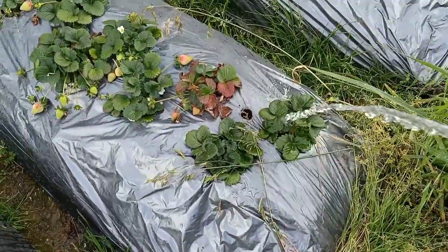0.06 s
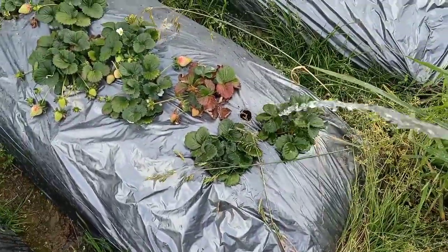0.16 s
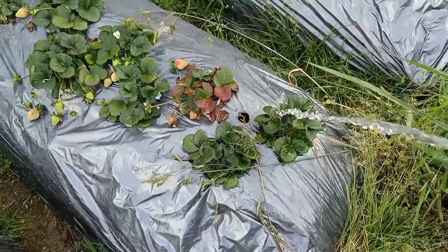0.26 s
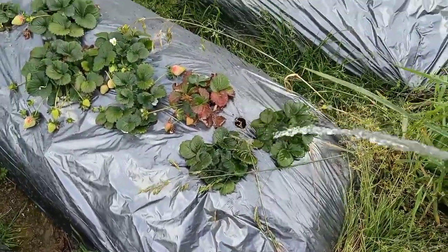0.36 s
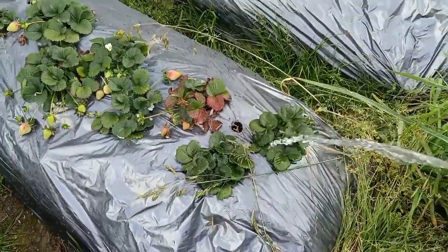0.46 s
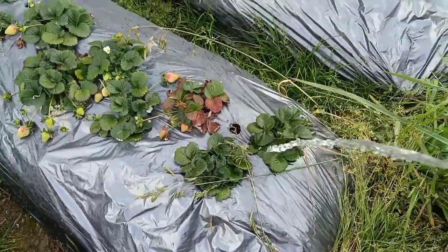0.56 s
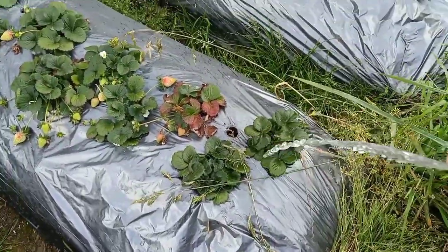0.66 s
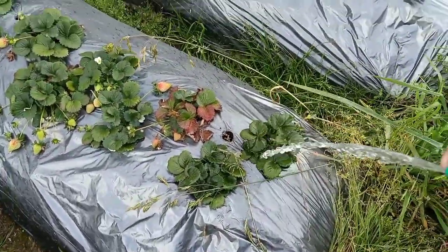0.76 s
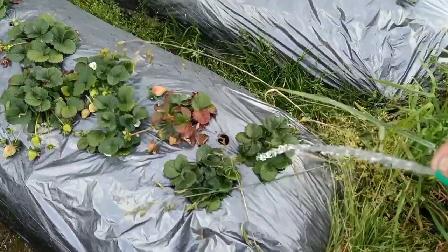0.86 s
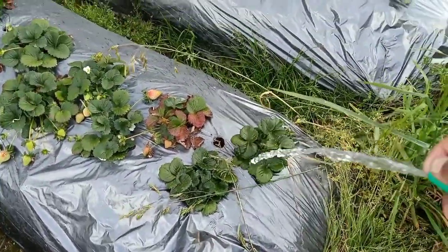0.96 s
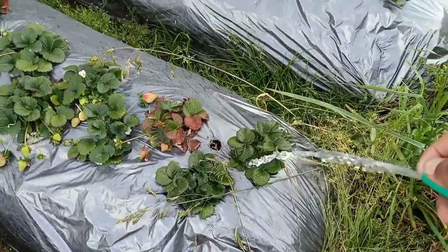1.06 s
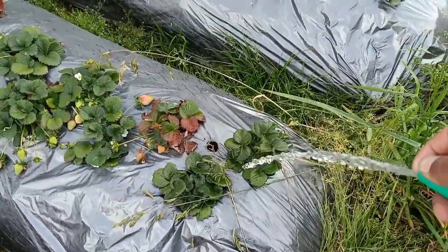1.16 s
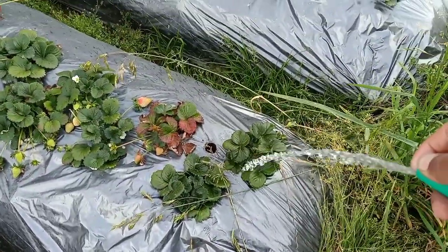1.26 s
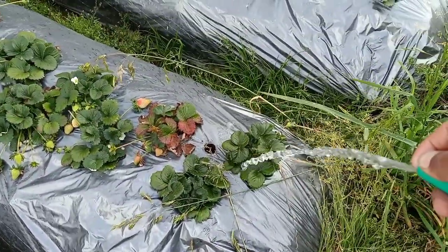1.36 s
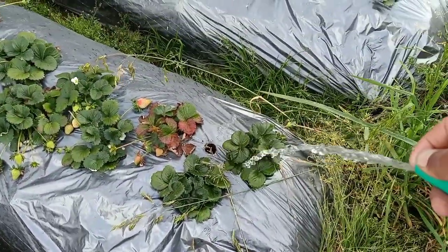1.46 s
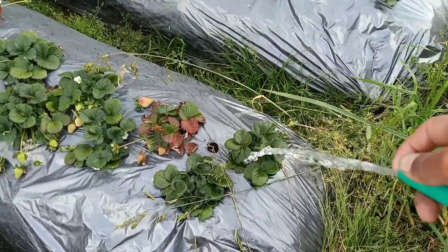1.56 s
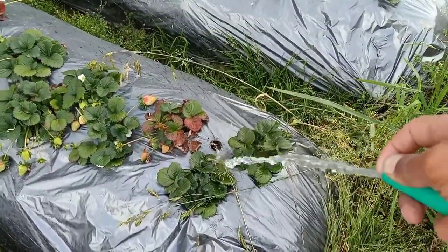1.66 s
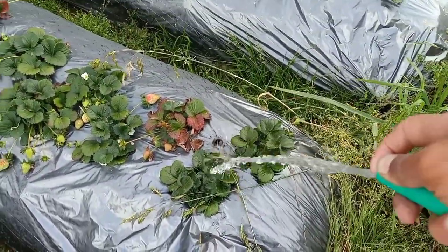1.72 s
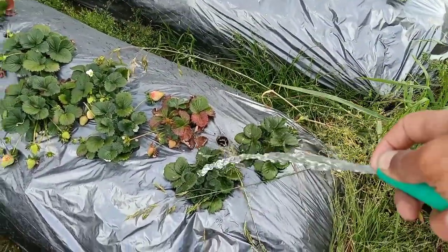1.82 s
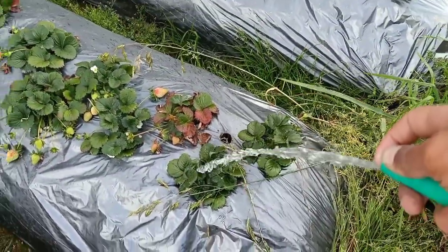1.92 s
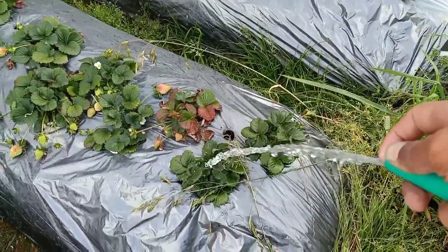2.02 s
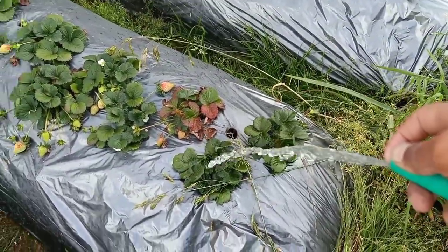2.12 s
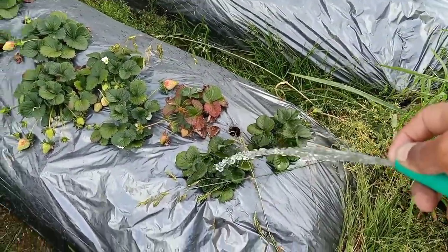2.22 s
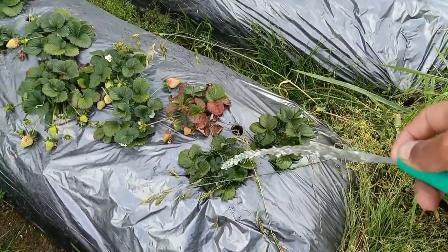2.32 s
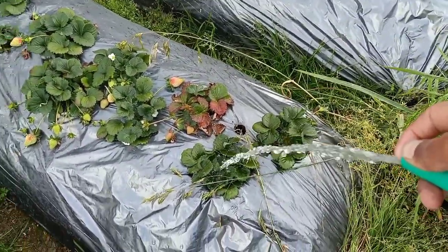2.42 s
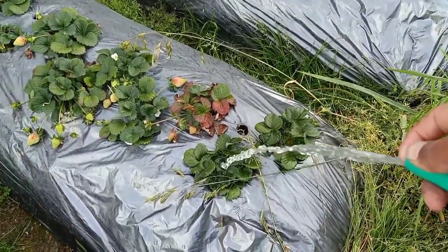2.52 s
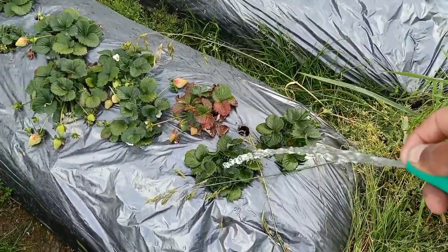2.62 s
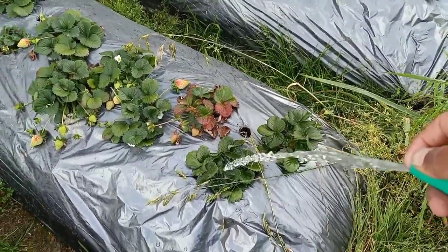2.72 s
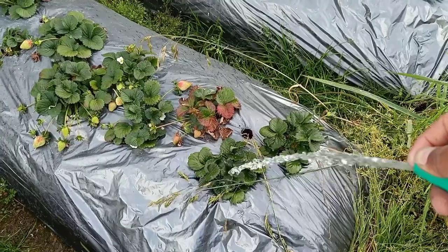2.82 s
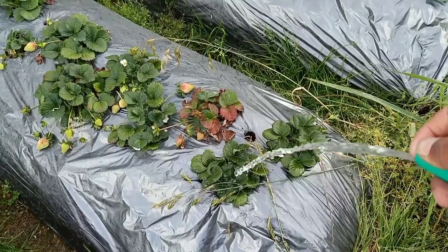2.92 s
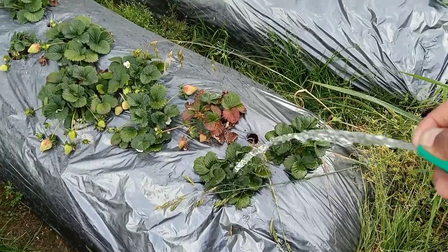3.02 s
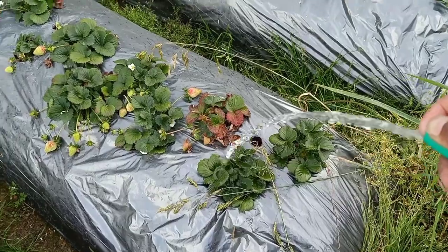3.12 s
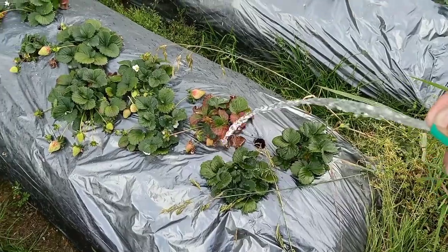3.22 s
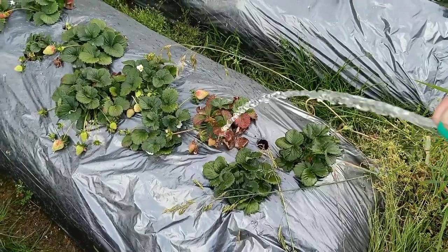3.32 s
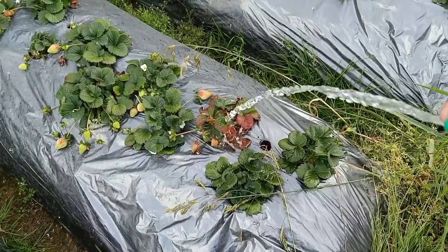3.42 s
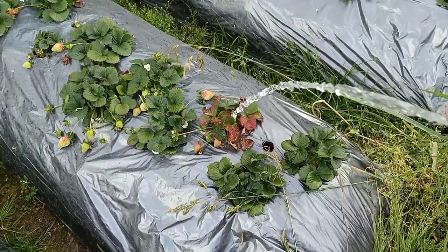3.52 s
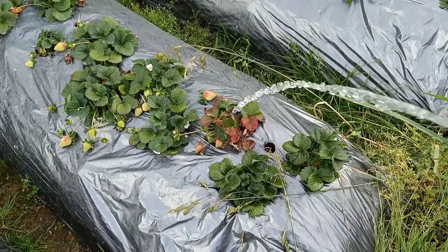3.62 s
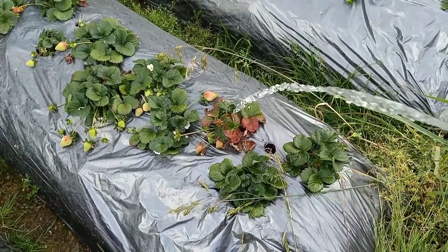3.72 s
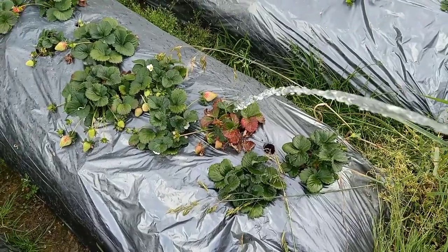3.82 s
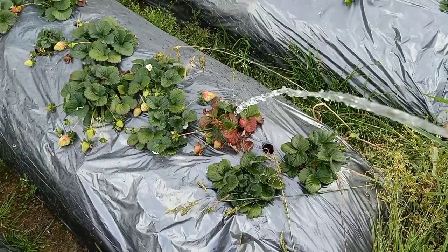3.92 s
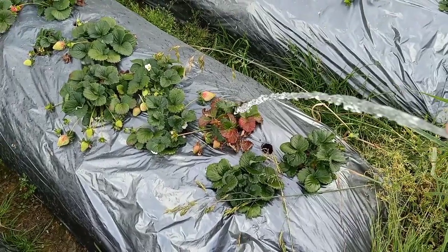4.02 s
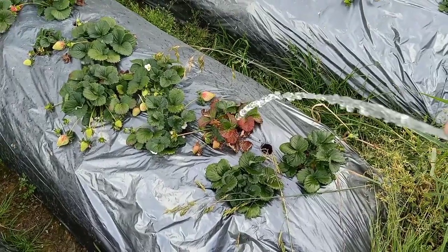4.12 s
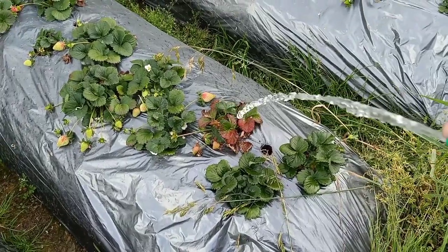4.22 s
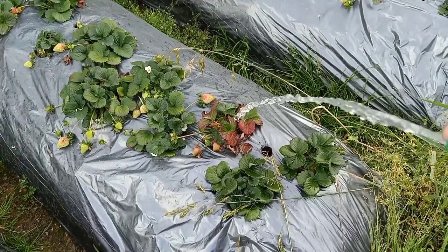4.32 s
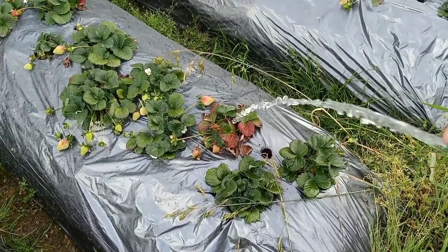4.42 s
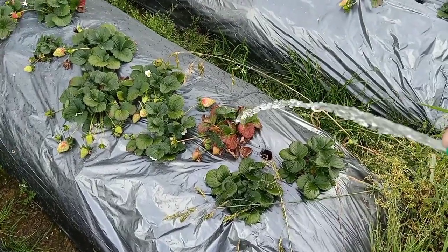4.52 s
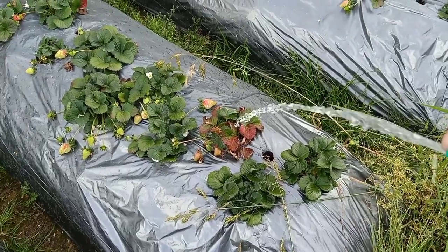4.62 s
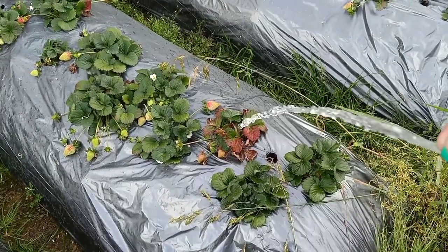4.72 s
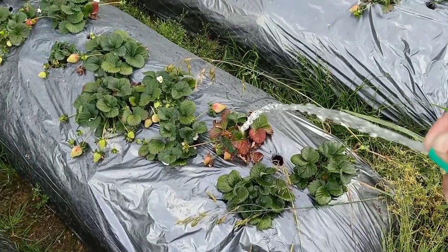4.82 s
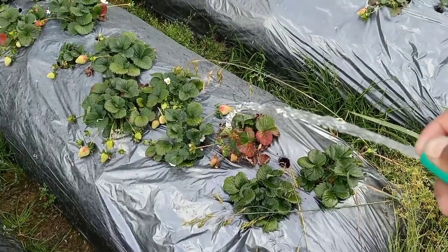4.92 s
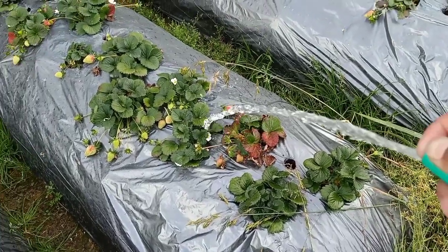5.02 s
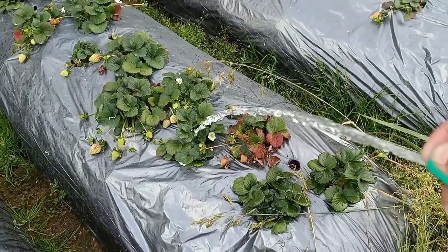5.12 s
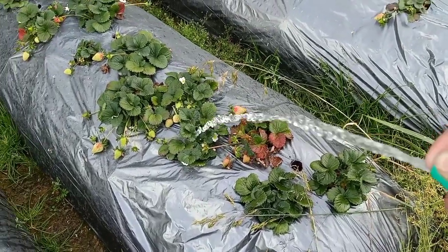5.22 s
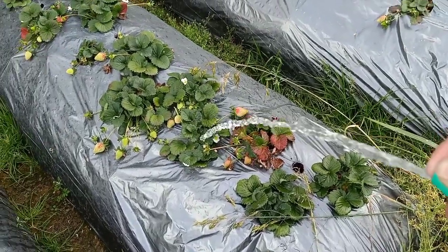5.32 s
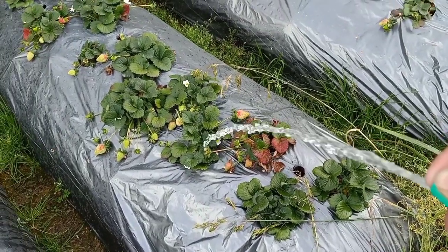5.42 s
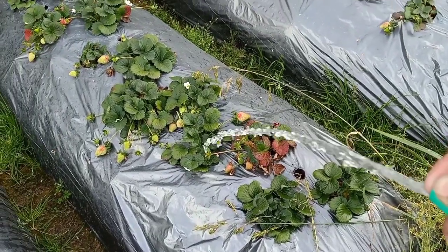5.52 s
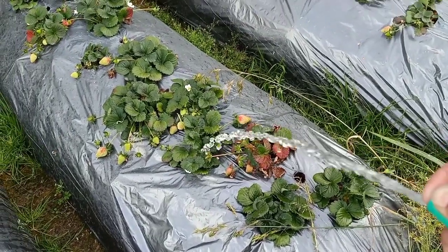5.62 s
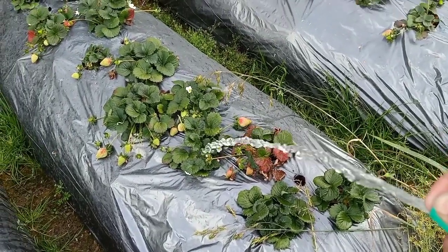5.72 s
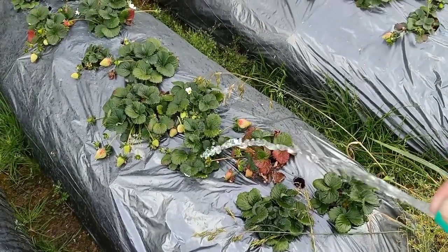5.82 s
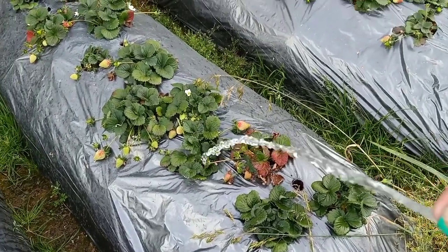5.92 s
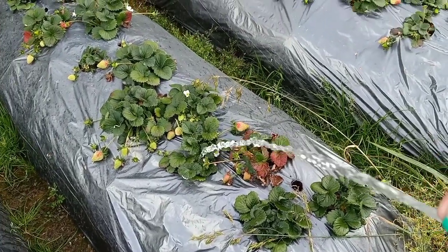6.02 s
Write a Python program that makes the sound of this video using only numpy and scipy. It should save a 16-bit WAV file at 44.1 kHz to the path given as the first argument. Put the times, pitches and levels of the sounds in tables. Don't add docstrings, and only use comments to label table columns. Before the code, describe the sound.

A hose stream pours without pause onto leafy plants and loose plastic sheeting, close and dry in open air. From 0 to 0.5 seconds it patters busily, with low drumming surges and small bubbling gurgles beneath. Until about 1.6 it is a little lighter and more hollow, with another gurgle near 1; a brief surge hits the sheet at 1.75. Pats cluster thickly around 2.4 to 2.5, and spray hisses more toward 3. At 3.2 a heavy wet slap lands with a low gulp. From 3.6 to 4.9 strong, rounded splats ring in a water-filled hollow, loudest near 4 and 4.1. At 5.0 to 5.2 the jet slaps bare sheet again with a deep gulp, then thins into crackling puffs and sharp ticks, left-leaning, until 6. Faint distant hum and soft late handling bumps lie underneath.

```python
import sys
import numpy as np
from scipy import signal
from scipy.fft import rfft, irfft, next_fast_len
from scipy.io import wavfile
from scipy.ndimage import uniform_filter1d, map_coordinates

SR = 44100
rng = np.random.default_rng(int(sys.argv[2]) if len(sys.argv) > 2 else 0)


def ratio_of_db(decibels):
    return 10 ** (np.asarray(decibels, float) / 20)


def output_pcm(signal):
    pcm = np.clip(np.atleast_2d(signal).T, -1, 1) * 32767
    wavfile.write(sys.argv[1], SR, np.round(pcm).astype(np.int16))


N = 267246


def unit(x):
    return x / np.sqrt(np.mean(x ** 2) + 1e-20)


def along(points, hz):
    f, v = np.transpose(points)
    return np.interp(np.log(hz + 1), np.log(f + 1), v)


def played(rows):
    s, *cols = np.transpose(rows)
    return [np.interp(np.arange(N) / SR, s, c) for c in cols]


def wobble(rate):
    knots = rng.standard_normal(int(N * rate / SR) + 4)
    return map_coordinates(knots, [np.arange(N) * rate / SR])


def filtered(x, response):
    m = next_fast_len(N + 8192)
    return irfft(rfft(x, m) * response(np.fft.rfftfreq(m, 1 / SR)), m)[..., :N]


def ring(x, hz, width_hz):
    return filtered(x, lambda f: 1j * f * width_hz / (hz * hz - f * f + 1j * f * width_hz))


def impacts(s, gain, hz, cycles, pan_db, lag_s, size):
    out, k = np.zeros((2, N)), np.arange(size) - size // 3
    for port, side in enumerate((.5, -.5)):
        at = s * SR + side * lag_s * SR
        whole = np.round(at).astype(int)[:, None] + k
        turns = (whole - at[:, None]) / SR * hz[:, None]
        lopsided = np.where(turns < 0, .7, 1.3)
        shape = np.exp(-(turns / (cycles * lopsided)) ** 2)
        wave = (gain * ratio_of_db(side * pan_db))[:, None] * shape * np.cos(2 * np.pi * turns)
        out[port] = np.bincount(np.clip(whole, 0, N).ravel(), wave.ravel(), N + 1)[:N]
    return out


def wash(patchy_db):
    # frequency in Hz, correlation from 0 to 1.
    likeness = [(30, 0.91), (70, 0.25), (130, 0.61), (290, 0.6), (640, 0.43), (1400, 0.5), (3100, 0.57),
                (5000, 0.31), (7000, 0), (15000, 0)]
    z = signal.stft(rng.standard_normal((2, N)), nperseg=256)[2]
    field = rng.standard_normal(z.shape[1:])
    field = uniform_filter1d(uniform_filter1d(field, 5, 0), 4, 1)
    pair = signal.istft(z * ratio_of_db(patchy_db * unit(field)), nperseg=256)[1][:, :N]

    def mid_side_gain(hz):
        turn = np.arccos(np.clip(along(likeness, hz), -1, 1)) / 2
        return np.array([np.cos(turn), np.sin(turn)])

    mid, side = filtered(pair, mid_side_gain)
    return unit(np.array([mid + side, mid - side]))


def patter(spectrum, clumps, hz, octaves, cycles, spread_db, lag_s, wash_db, u, size):
    g = rng.standard_normal(u.shape)
    gain = ratio_of_db(-spread_db * np.log(1 - .95 * u[:, 1])) * np.sign(u[:, 2] - .5)
    pitch_hz = np.clip(hz * 2 ** (octaves * g[:, 0]), 220, 15000)
    drops = impacts(u[:, 0] * N / SR, gain, pitch_hz, cycles, 2.7 * g[:, 1], lag_s * g[:, 2], size)
    power = uniform_filter1d(np.abs(rfft(drops)).mean(0) ** 2, 1500)
    flat = unit(irfft(rfft(drops) / np.sqrt(power + .03 * power.max()), N))
    mix = clumps * (flat + ratio_of_db(wash_db) * wash(patchy_db=-0.5))
    return unit(filtered(mix, lambda f: ratio_of_db(along(spectrum, f))))


def surroundings():
    # frequency in Hz, level in dB per Hz.
    hum_colour = [(12, -38), (20, 0), (35, -24), (54, -8), (300, -9), (528, -8.5), (700, -3), (910, -32),
                  (1540, -120)]
    # time in seconds, peak level in dB, pitch in Hz.
    hand_bumps = [
        (5.575, -35, 111),
        (5.614, -42, 48.7),
        (5.854, -33, 101),
        (6.039, -43, 40.7),
    ]
    gusts = ratio_of_db(1.5 * wobble(13))
    hum = unit(filtered(wash(patchy_db=3.5), lambda f: ratio_of_db(along(hum_colour, f))))
    s, db, hz = np.transpose(hand_bumps)
    bumps = impacts(s + 0.0069, ratio_of_db(db - 9.5), hz, 0.93, 7 + 0 * s, 0.0017 + 0 * s, size=3000)
    return ratio_of_db(-63) * gusts * hum + bumps


def gurgles():
    # middle of the run in seconds, level in dB, pitch in Hz.
    pockets = [
        (0.1, -37.5, 523),
        (0.331, -37.5, 525),
        (0.991, -35, 527),
        (1.41, -42, 480),
        (2.6, -49, 640),
        (2.82, -41, 596),
        (3.0, -43.5, 560),
        (3.259, -41.5, 233),
        (5.128, -43.5, 136),
    ]
    bubbles = 14
    s, db, hz = np.repeat(np.transpose(pockets), bubbles, axis=1)
    place = np.tile(np.linspace(-1, 1, bubbles), len(pockets))
    g = rng.standard_normal((len(s), 3))
    swell_db = db - 9 * place ** 2 + 1.4 * g[:, 1]
    at_s = s + 0.05 * place + 0.00301 * g[:, 0]
    return impacts(at_s, ratio_of_db(swell_db), hz * 2 ** (0.2 * g[:, 2]), 1.02, 0 * s, 0 * s, size=900)


def ticks():
    # time in seconds, peak level in dB, pitch in Hz, left over right in dB.
    near_spray = [(0.04, -28, 7060, 12), (0.1102, -29, 6760, 17), (0.249, -27.5, 7150, 11),
                  (0.419, -23, 7650, 8), (0.6813, -29, 6640, 6), (0.7246, -23, 8200, 10),
                  (0.8393, -32, 6790, 8), (0.9535, -26.5, 6640, 9), (1.3145, -26.5, 5800, 4),
                  (1.3219, -33, 5770, 2), (1.5646, -30, 5700, 9), (1.6761, -28.0, 6060, 1),
                  (1.7858, -25.5, 5420, -1), (1.8767, -28.5, 7160, 6), (1.957, -29, 7950, 14),
                  (2.0069, -29.5, 8290, 11), (2.4058, -27, 7850, 8), (2.598, -25.5, 7100, 8),
                  (2.8561, -30, 6830, 5), (2.9132, -24, 6600, 7), (3.0486, -23, 7350, 6),
                  (3.1445, -25, 6900, 9), (3.342, -23.5, 6860, 7), (3.4337, -20, 7240, 2),
                  (3.693, -24.5, 6300, 6), (3.817, -33, 7410, 8), (3.8366, -25.0, 7340, 7),
                  (3.945, -25, 8500, 11), (4.039, -30, 7300, 11), (4.0801, -35, 6220, 6),
                  (4.158, -24.5, 8200, 11), (4.3988, -24.5, 6940, 11), (4.7696, -28, 7100, 11),
                  (4.9176, -26.0, 5300, -1), (5.0486, -21.5, 7340, 8), (5.102, -24, 6420, 3),
                  (5.2023, -22.5, 6880, 10), (5.254, -28, 7250, 7), (5.395, -24, 6590, 4),
                  (5.402, -29, 6660, 0), (5.409, -22, 6050, 8), (5.418, -34, 7250, 3),
                  (5.4785, -17, 6700, 7), (5.6461, -27, 7640, 7), (5.6988, -22.5, 6660, 5),
                  (5.7396, -24, 6600, 10), (5.794, -24, 7600, 5), (5.8146, -18, 6700, 2),
                  (5.842, -22.5, 6850, 11), (5.85, -22, 7400, 4),
                  (5.36, -28, 6000, 4),
        (5.454, -27, 6800, 6),
        (5.465, -31, 6500, 4),
        (5.601, -25, 6500, 5),
        (5.6205, -21.5, 6040, 1),
        (5.769, -22, 5960, 1),
    ]
    pieces = 12
    s, db, hz, pan_db = np.repeat(np.transpose(near_spray), pieces, axis=1)
    shard = np.arange(len(s)) % pieces > 0
    g = rng.standard_normal((len(s), 3))
    late_s = 0.00089 + 0.0009 * shard * (g[:, 0] + 0.298)
    pitch_hz = np.clip(hz * 2 ** ((0.027 + 0.4 * g[:, 1]) * shard), 2500, 14500)
    gain = ratio_of_db(db - 4.5 - 8.6 * shard)
    return impacts(s + late_s, gain, pitch_hz, 2.1, pan_db - 5.5, 4e-5 * g[:, 2], size=64)


def splats():
    # time in seconds, peak level in dB,
    # pitch in Hz, length in cycles.
    leaf_drops = [(0.0401, -24.5, 2470, 1.2), (0.0772, -25.0, 2320, 1.0), (0.0915, -32, 2140, 0.7),
                  (0.1578, -21.5, 1920, 1.5), (0.211, -21.5, 2090, 1), (0.2187, -17.5, 2410, 1.3),
                  (0.2295, -26, 2060, 2.4), (0.2499, -22.5, 2200, 0.9), (0.2567, -21.5, 2090, 0.94),
                  (0.2627, -18, 2120, 0.63), (0.2691, -20, 2320, 1.1), (0.2883, -18, 2290, 1.3),
                  (0.2963, -21, 2200, 0.67), (0.3898, -17, 2170, 1.2), (0.4471, -19, 2450, 1.1),
                  (0.505, -19, 2370, 1.3), (0.5437, -24.5, 2240, 1.8), (0.5862, -23, 2460, 2.0),
                  (0.6809, -23, 3270, 0.86), (0.7077, -19, 2720, 1.2), (0.7585, -21, 3150, 1.2),
                  (0.7632, -19.5, 2540, 1.6), (0.7836, -25, 2800, 1.1), (0.8236, -25.0, 2370, 1.2),
                  (0.914, -23, 2640, 1.6), (0.9388, -25.0, 3060, 1.1), (0.9535, -27, 2800, 0.88),
                  (1.0915, -23.0, 2220, 0.92), (1.1067, -16.5, 2330, 0.71), (1.16, -24.5, 3020, 1.7),
                  (1.2735, -20, 2210, 0.9), (1.349, -20, 2500, 1.3), (1.3772, -22.5, 2680, 1),
                  (1.4216, -18, 2470, 0.98), (1.456, -17, 2360, 1.0), (1.4804, -20, 2880, 1.3),
                  (1.5407, -25.0, 2480, 1.3), (1.5846, -22, 2390, 0.57), (1.655, -23, 2140, 0.8),
                  (1.6766, -15, 3160, 1.7), (1.683, -23, 2360, 0.6), (1.7498, -23, 2330, 0.9),
                  (1.7605, -24.0, 2100, 0.7), (1.7856, -23, 2310, 0.9), (1.8616, -20.5, 2120, 0.7),
                  (1.882, -22.0, 2570, 0.8),
                  (1.941, -24.5, 2250, 0.65), (2.0008, -25.0, 2220, 0.77), (2.208, -22.5, 2630, 2.1),
                     (2.3398, -21, 2390, 0.66), (2.3569, -19, 2240, 0.7), (2.4163, -14.5, 2200, 0.69),
                     (2.447, -21, 2040, 0.72), (2.4635, -18, 2610, 0.65), (2.4687, -15, 2410, 1.3),
                     (2.4796, -16, 2370, 0.98), (2.486, -17, 2110, 0.92), (2.5019, -16, 2330, 1.1),
                     (2.5185, -16, 2540, 0.7), (2.564, -25, 2220, 0.9), (2.5743, -21.5, 2170, 0.9),
                     (2.6399, -22, 2190, 0.65), (2.675, -20.5, 2380, 1.1), (2.6862, -21, 2340, 1.1),
                     (2.7406, -26, 2300, 0.7), (2.7599, -23, 2070, 1.3), (2.7782, -21, 2280, 0.83),
                     (2.808, -21, 2040, 1.0), (2.8371, -18, 2500, 1), (2.8454, -20, 2160, 0.9),
                     (2.8856, -20, 2450, 0.73), (2.9129, -23.0, 2130, 1.3), (2.928, -20, 2370, 1.2),
                     (2.9535, -19, 2520, 0.62), (3.0344, -19, 2430, 1.2), (3.0728, -21.5, 2320, 1.1),
                     (3.0823, -16, 2420, 1.1), (3.124, -20, 2670, 1.0), (3.1964, -19.5, 2190, 0.79),
                     (3.2051, -22, 1880, 1.6), (3.2176, -16, 1930, 0.83), (3.2697, -19.0, 2280, 0.9),
                     (3.3077, -27, 2480, 0.8), (3.3659, -23, 1860, 1), (3.3832, -20, 2650, 0.9),
                     (3.3912, -22, 2270, 0.78), (4.9897, -19, 2330, 1.8), (5.0584, -17, 2130, 0.65),
                     (5.0825, -21, 1850, 1.2), (5.4784, -20.5, 2120, 0.81), (5.7679, -21.5, 2360, 0.66),
                     (6.0432, -27, 2390, 0.8)]
    hollow_drops = [(3.5639, -27.5, 2940, 0.9), (3.5992, -20.5, 2930, 1), (3.6617, -17, 2280, 0.74),
                    (3.6927, -22.0, 2740, 2.5), (3.6983, -19.5, 2570, 3.5), (3.7197, -18, 2420, 0.9),
                    (3.7274, -19.5, 2360, 1.1), (3.7805, -22.0, 2500, 1.8), (3.7881, -20, 2670, 2.8),
                    (3.7983, -24, 2410, 2.1), (3.8366, -15, 2500, 1.3), (3.8519, -19, 2410, 2.7),
                    (3.8786, -15, 2350, 1), (3.9379, -16, 2330, 1.2), (3.945, -15, 2310, 0.82),
                    (3.9603, -18, 2080, 0.85), (3.9755, -20.5, 2470, 1.2), (3.9804, -23, 2390, 1.3),
                    (3.9911, -8.5, 2410, 0.9), (4.0563, -27, 2490, 1.4), (4.0632, -25, 2270, 1.1),
                    (4.0718, -18.5, 2350, 1.4), (4.0799, -9, 2390, 1.36), (4.0967, -27, 2370, 1.4),
                    (4.125, -17, 2410, 1.4), (4.1396, -22, 2270, 1.1), (4.1491, -17.5, 2250, 1.6),
                    (4.1839, -18.5, 2270, 1.8), (4.1953, -14.5, 2740, 1.3), (4.2226, -19.0, 2330, 2.9),
                    (4.2917, -21.5, 2150, 1.2), (4.3457, -21, 2460, 1.6), (4.3723, -26, 2340, 1.0),
                    (4.3807, -24, 2330, 1.3), (4.3947, -18, 2120, 0.72), (4.4022, -20, 2410, 1.1),
                    (4.4101, -17, 2420, 0.78), (4.5857, -23, 2570, 1.9), (4.5964, -22.0, 2440, 1.8),
                    (4.6053, -21, 2590, 1.4), (4.6371, -17, 2520, 1.6), (4.6432, -11, 2700, 1.1),
                    (4.6833, -19.5, 2530, 1.2), (4.7423, -19.0, 2510, 2.8), (4.7623, -18, 2290, 1.0),
                    (4.771, -24, 2290, 1.5), (4.8477, -16, 2550, 1.7), (4.8579, -16.5, 2610, 2.3),
                    (4.8631, -21.5, 2460, 1.8), (4.9182, -18, 3100, 0.55)]
    # time in seconds, peak level in dB, pitch in Hz, thud over the pat in dB.
    heavy_slugs = [(0.111, -15.5, 2090, -4), (0.1994, -24, 2270, -3), (.275, -19, 2280, -6.5),
                   (0.366, -19, 2050, -4), (0.407, -18, 2130, -8), (0.4199, -14, 2500, -16),
                   (1.742, -24.5, 2260, 4), (2.368, -19, 2010, -11), (2.4056, -19, 1880, -11),
                   (3.2237, -11, 1750, -6.5), (3.231, -16, 1560, -13), (3.2364, -21, 2520, -17),
                   (3.2452, -17, 1830, -4), (4.558, -22, 1450, -14), (5.0761, -17, 2270, -6),
                   (5.0955, -24, 1100, 3), (5.149, -21, 1160, -15)]
    rows = [(*r, -19) for r in leaf_drops]
    rows += [(*r, -31) for r in hollow_drops]
    rows += [(*r[:3], 1, r[3]) for r in heavy_slugs]
    s, db, hz, cycles, thud_db = np.transpose(rows)
    g = rng.standard_normal((len(s), 3))
    pan_db, lag_s = 0.87 * g[:, 2], 2e-5 * g[:, 0]
    pats = impacts(s + 0.000909, ratio_of_db(db - 2.0), hz, 0.99 * cycles[:, None], pan_db, lag_s, size=320)
    cracks = impacts(s + 0.0008, ratio_of_db(db - 15), 5500 + 0 * s, 0.76, pan_db, lag_s, size=48)
    thud_hz = 650 * 2 ** (0.39 * np.clip(g[:, 1], -1, 2))
    thuds = impacts(s + 0.001, ratio_of_db(db + thud_db - 5.0), thud_hz, 0.31, pan_db, 0 * s, size=256)
    return pats + cracks + thuds


def bursts(base_db, rows, rise, fall):
    t, power = np.arange(N) / SR, ratio_of_db(2 * np.array(base_db))
    for s, hold_s, *tops_db in rows:
        loss_db = rise * np.clip(s - t, 0, 1) + fall * np.clip(t - s - hold_s, 0, 2)
        power = power + ratio_of_db(2 * np.array(tops_db))[:, None] * ratio_of_db(-2 * loss_db)
    return 10 * np.log10(power)


def aim():
    # time in seconds, force on the leaves in dB, bare sheet over it in dB.
    landing = [(0, -46.5, -3.5), (.18, -42.5, -6), (.22, -36.5, -11), (.56, -41.5, -5.5),
               (1.48, -39.5, -4.5), (1.63, -43, -3.5), (2.26, -41, -9), (2.48, -39.5, -6.5),
               (2.55, -39.5, -8.5), (3.07, -38.5, -10.5), (3.17, -44, -9), (3.48, -50, -3.5),
               (3.73, -35.5, -13), (4.22, -36.5, -17.5), (4.39, -37, -14.5), (4.89, -35.5, -16),
               (5.02, -49.5, -4), (6.06, -42, -5)]
    # time in seconds, fine spray in dB, coarse drops over it in dB.
    breakup = [(0, -48.5, -4), (.49, -46, -4.5), (.57, -53.5, 4), (.72, -51, 5), (.99, -55.5, 8),
               (1.3, -53.5, 7), (1.64, -60.5, 12.5), (1.71, -48, -1.5), (2.02, -48.5, -2.5),
               (2.88, -42, -5.5), (3.13, -44.5, -4), (3.18, -51.5, 3), (3.31, -48.5, 2.5),
               (3.38, -45.5, -5), (4.17, -46.5, -6), (4.97, -49.5, -3.5), (5.13, -48, 0), (5.36, -43, -12)]
    # start in seconds, hold in seconds, sheet level in dB, leaf level in dB.
    sweeps = [(0.084, 0.068, -39.5, -38.5), (0.214, 0.082, -38.5, -50), (0.353, 0.052, -38.5, -44),
              (1.567, 0.014, -42.5, -55), (1.677, 0.014, -42, -39.5), (1.748, 0.014, -34.5, -37),
              (1.792, 0.017, -44, -55), (2.86, 0.011, -47, -41), (3.222, 0.0061, -27.5, -29),
              (3.254, 0.051, -37, -32), (3.334, 0.083, -42, -48), (4.074, .005, -61, -44),
              (5.01, .002, -45.5, -40), (5.066, 0.036, -36.5, -38), (5.14, 0.012, -38, -36.5),
              (5.187, .005, -42, -46), (5.26, 0.13, -46.5, -46.5), (5.917, .01, -66, -52)]
    # start in seconds, hold in seconds, fine spray level in dB, coarse level in dB.
    puffs = [
        (0.656, 0.0091, -50, -44),
        (1.682, .002, -52, -44),
        (3.21, .005, -49, -44),
        (3.357, 0.0079, -43.5, -62),
        (5.05, .002, -54, -58),
        (5.377, 0.054, -45, -50.5),
        (5.532, 0.16, -53, -50.5),
        (5.752, 0.17, -51.5, -48),
    ]
    force_db, bare_db = played(landing)
    fine_db, coarse_db = played(breakup)
    sheet_db, leaves_db = bursts([force_db + bare_db, force_db], sweeps, rise=359, fall=263)
    spray_db, splash_db = bursts([fine_db, fine_db + coarse_db], puffs, rise=347, fall=180)
    return sheet_db, leaves_db, spray_db, splash_db


def sheet_drumming(drops, slugs, beads):
    # frequency in Hz, level in dB per Hz.
    sheet_colour = [(60, 6), (115, 0), (190, -10), (250, -7.5), (330, -5.5), (540, -2), (780, -3.5),
                    (1000, -1.5), (1500, -5.5), (2600, 2.5), (5000, -42)]
    sway = .6 * wobble(9)
    clumps = ratio_of_db(0.96 * slugs + 0.3 * beads + sway)
    return patter(sheet_colour, clumps, 603, 0.87, 1.06, 2.06, 4e-5, 0.013, u=drops, size=160)


def leaf_patter(drops, slugs, beads):
    # frequency in Hz, level in dB per Hz.
    leaf_colour = [(500, -22), (1200, -12), (1700, -3), (2050, -3.5), (2450, -1), (2900, -4.5),
                   (3500, -17.5), (4300, -19.5), (8000, -74)]
    # time in seconds, share of drops falling into a hollow (0-1), how full of water it stands (0-1).
    hollow_moves = [(0, .3, 0), (.5, .26, 0.1), (.7, 1, 0.83), (1.6, .1, 0.5), (1.9, 0, 0.6),
                    (2.4, .03, 0.2), (3.1, 0.1, .5), (3.3, 0.09, 0.3), (3.6, 1, 1), (4.3, 0.53, 0.75),
                    (4.9, 0.8, 0.96), (5.05, .06, 0), (5.5, 0.15, 0.1), (6.06, .3, 0.6)]
    # resonance in Hz, width in Hz.
    cavity = [
        (2150, 450),
        (2850, 1600),
    ]
    hollow, full = np.clip(played(hollow_moves), 0, 1)
    full = np.clip(full + 0.24 * wobble(25), 0, 1)
    clumps = ratio_of_db(0.59 * slugs + 0.99 * beads)
    leaves = patter(leaf_colour, clumps, 2380, 0.38, 1.08, 1.25, 2e-5, 6.7, u=drops, size=128)
    empty_ring, full_ring = ring(leaves, *cavity[0]), ring(leaves, *cavity[1])
    cupped = unit(np.sqrt(1 - full) * empty_ring + np.sqrt(full) * full_ring)
    return np.sqrt(1 - hollow) * leaves + np.sqrt(hollow) * cupped


def coarse_splash(drops, slugs, beads, specks):
    # frequency in Hz, level in dB per Hz.
    splash_colour = [(1500, -34), (2800, -2.5), (3550, 0.5), (4200, -2), (5000, -0.5), (6000, -7),
                     (8400, -10.5), (9800, -17), (15000, -15)]
    clumps = ratio_of_db(1.22 * slugs + 0.5 * beads + 1.23 * specks)
    return patter(splash_colour, clumps, 4960, 0.8, 1.46, 4.6, 1.5e-5, 3.8, u=drops, size=64)


def fine_spray(drops, slugs, beads, specks, spray_db):
    # frequency in Hz, level in dB per Hz.
    spray_colour = [(3500, -30), (5200, -8), (6200, -4), (7200, -4), (8400, -6), (9000, -10), (9700, -14),
                    (10300, -13), (11300, -13), (12400, -17), (13400, -12), (14300, -16), (15300, -14)]
    clumps = ratio_of_db(0.65 * slugs + 0.98 * beads + 1.08 * specks)
    spray = patter(spray_colour, clumps, 8420, 0.52, 3.0, 4.8, 2.5e-5, 0.48, u=drops, size=48)
    spray = unit(spray + [[1.1], [0]] * ring(spray, 7110, 550))
    finest = filtered(spray, lambda f: 1 / (1 + (9300 / (f + 1)) ** 12))
    return spray - finest + finest * ratio_of_db(0.32 * (spray_db.mean() - spray_db))


def stream(sheet_db, leaves_db, spray_db, splash_db):
    slugs, beads, specks = wobble(30), wobble(110), wobble(70)
    drops = rng.random((9000, 3))
    sheet = sheet_drumming(drops[4000:], slugs, beads)
    leaves = leaf_patter(drops[:4000], slugs, beads)
    splash = coarse_splash(drops[:5000], slugs, beads, specks)
    spray = fine_spray(drops, slugs, beads, specks, spray_db)
    struck = ratio_of_db(sheet_db - 0.5) * sheet + ratio_of_db(leaves_db - 2.31) * leaves
    return struck + ratio_of_db(splash_db + 2.0) * splash + ratio_of_db(spray_db - 1.5) * spray


def scene():
    water = gurgles() + ticks() + splats() + stream(*aim())
    return surroundings() + filtered(water, lambda f: 1 / (1 + (140 / (f + 1)) ** 4))


def top_cut(x):
    return signal.sosfilt(signal.butter(12, 16690, fs=SR, output="sos"), x)


def record(dry):
    # frequency in Hz, left over right in dB.
    port_colour = [(60, 2), (92, -2), (140, 1), (210, 2), (330, 0), (500, 4), (770, 1), (1170, -4.5),
                   (1790, -1.5), (2740, 1.5), (4190, -3), (6410, 5.5), (9810, 11), (15000, 9.5)]
    # frequency in Hz, lead of the left port in radians.
    port_lead = [(20, 0), (430, .1), (780, -.8), (1720, .3), (2930, -.4), (3960, 0), (5680, .2), (8100, -1),
                 (10500, -3)]
    top_hz, dc_offset = 15650, .0021
    side = np.array([[.5], [-.5]])

    def port_response(f):
        colour = ratio_of_db(side * along(port_colour, f))
        return (f < top_hz) * colour * np.exp(1j * side * along(port_lead, f))

    return top_cut(filtered(dry, port_response) + dc_offset)


dry = scene()
out = record(dry)
output_pcm(out)
```